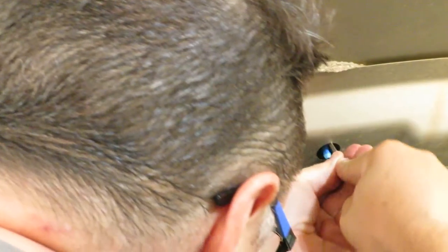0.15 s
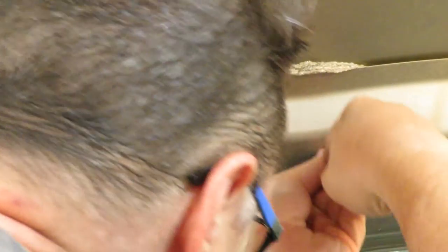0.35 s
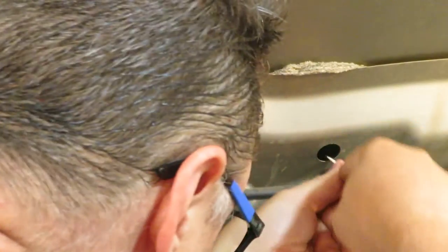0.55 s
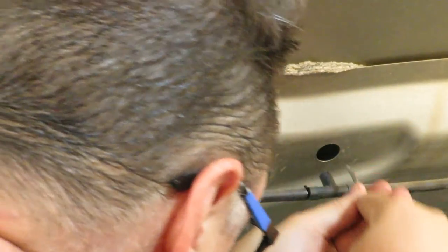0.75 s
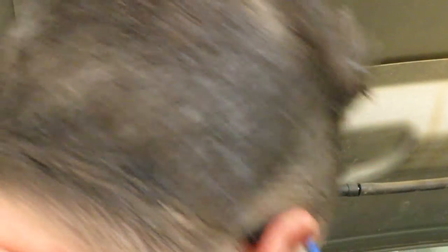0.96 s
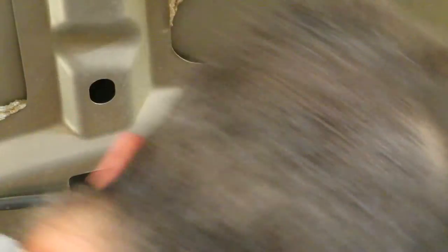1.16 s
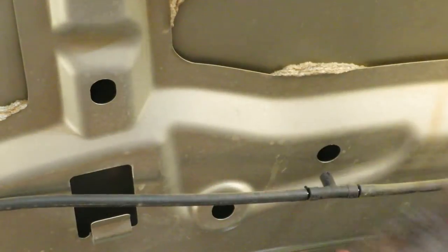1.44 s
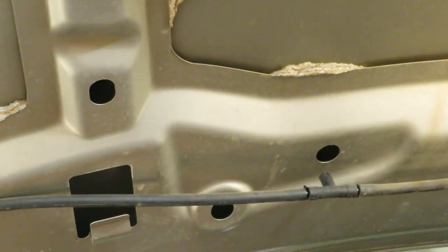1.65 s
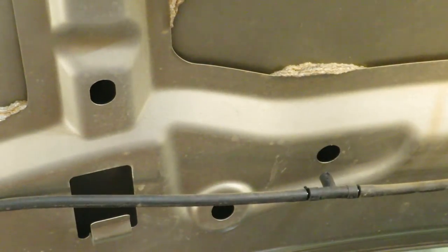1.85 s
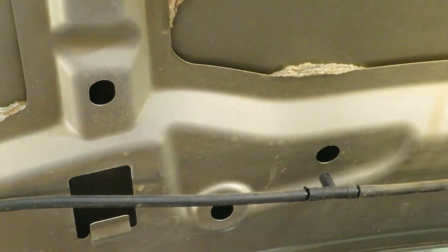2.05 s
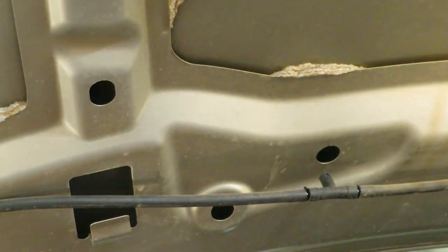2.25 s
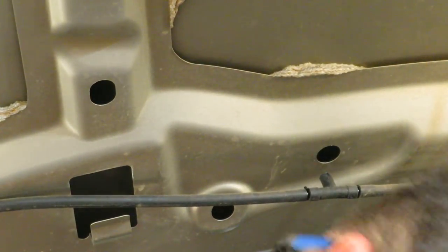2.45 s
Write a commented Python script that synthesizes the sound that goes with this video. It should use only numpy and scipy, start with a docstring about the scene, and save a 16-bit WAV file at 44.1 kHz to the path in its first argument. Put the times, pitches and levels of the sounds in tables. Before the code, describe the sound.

A plastic part snaps with one loud crack, then faint rubbing and clicks in a garage.

```python
"""Plastic crackles, then snaps with a loud crack: a nozzle worked out from under a car bonnet in a garage.
The crack overloads the microphone and sets panel and room ringing. Fingers rub the broken stub,
loose plastic clatters, metal ticks lightly and feet shuffle over a low rumble and faint hum.
The gain control ducks after the crack and lets the background creep back."""
import sys
import numpy as np
from scipy import signal
from scipy.fft import rfft, irfft
from scipy.io import wavfile

SR = 44100
rng = np.random.default_rng(int(sys.argv[2]) if len(sys.argv) > 2 else 0)


def unload_wav(signal):
    """Save mono or channel-first audio to the path in sys.argv[1] as 16-bit WAV at rate SR, clipped to [-1, 1]."""
    wavfile.write(
        sys.argv[1],
        SR,
        np.round(np.clip(np.atleast_2d(signal).T, -1, 1) * 32767).astype(np.int16),
    )


N = 114660
T = np.arange(N) / SR
BIN_HZ = np.maximum(np.arange(N // 2 + 1) * SR / N, 1)

# stereo width of air and swish: freq_hz, side_to_mid_db
AIR_WIDTH = [(30, -6.5), (70, -24), (130, -21.5), (400, -5.5), (1000, -10), (2000, -4.5), (4000, -3),
             (12000, -0.5)]


def snap():
    """The nozzle tears, then breaks in a dense burst; bonnet panel and garage ring on."""
    # break spectrum: freq_hz, density_db
    break_colour = [(50, -40), (160, -17), (450, -3.5), (900, -2.5), (1750, 3), (2400, -5.5), (3300, -3),
                    (5500, -21.5), (8200, -12), (12000, -22), (15500, -32)]
    # bonnet modes: freq_hz, gain_db, t60_s
    panel_modes = [(226.4, -7.5, 0.64), (345.5, -3, .55), (445, -5.5, 0.6), (474.6, -7, 0.48),
                   (549, -9, 0.68), (631, -1, 0.14), (861, -4, 0.46), (1134, -12.5, 0.94),
                   (1718, -1.5, 0.14), (1868, -3, .42), (2500, -5.5, 0.58)]
    # garage tail spectrum: freq_hz, density_db
    tail_colour = [(50, -32), (115, -14), (165, -14), (260, -11), (400, -2.5), (700, -8), (1150, -11),
                   (1800, -10), (3500, -17.5), (5500, -28.5), (8500, -35), (13000, -39), (15000, -52)]
    tear_s, break_s, attack_s = .2453, .2484, .0053
    tear_noise = noise([(100, 1.5), (700, -2.5), (3000, -7.5), (14000, -16)])
    tear = from_db(-20) * rise(tear_s, .0005) * decay(T - tear_s, t60_s=.05) * tear_noise
    onset = rise(break_s, attack_s)
    burst = from_db(13) * onset ** 2 * decay(T - break_s, t60_s=.12) * noise(break_colour)
    panel = onset * ring(blows([(break_s, -4)]), panel_modes)
    return tear + burst + panel + from_db(4) * garage_tail(tail_colour, break_s)


def crackles():
    """Strained plastic slips under the fingers and rings the nozzle."""
    # click runs: start_s, level_db, length_s
    runs = [(.129, -33, 0.018), (.211, -23.5, .012), (.2345, -24, 0.0075), (.42, -5, .015),
            (.652, -23.5, .012), (.693, -28, .02), (.756, -20.5, .025), (.82, -26.5, 0.012),
            (.833, -22, .025), (1.001, -21, 0.011)]
    # nozzle modes: freq_hz, gain_db, t60_s
    modes = [(1700, -8, 0.0041), (2970, -3.5, .0035), (5000, -5.5, .0012), (7500, -5, 0.0011),
             (10100, -3.5, 0.0015), (13000, -4.5, .0008)]
    return ring(slips(runs), modes)


def rubbing():
    """Grainy friction of fingers on the broken stub."""
    # friction envelope: time_s, level_db
    envelope = [(.27, -72), (.33, -19.5), (.6, -33), (.7, -31.5), (.735, -35), (.78, -33.5), (.81, -39.5),
                (.83, -34.5), (.88, -43.5), (1.05, -60)]
    # friction spectrum: freq_hz, density_db
    colour = [(200, -26), (550, -1), (1000, -5), (1600, 0), (3000, -2.5), (4800, -15.5), (8000, -22.5),
              (15000, -41)]
    grain_db = 2.5 * wander(per_s=560)
    return from_db(np.interp(T, *np.transpose(envelope)) + grain_db) * noise(colour)


def clatters():
    """The loose plastic piece rattles in short runs of soft contacts."""
    # contact runs: start_s, level_db, length_s, tilt_db_per_octave
    runs = [(0.92, -19, .012, 4.5), (0.975, -28, .004, 7.5), (1.084, -15, .03, -0.5),
            (1.152, -26.5, .015, 10), (2.156, -33.5, .008, 4.5)]
    # modes of the piece: freq_hz, gain_db, t60_s
    modes = [(617, -7, 0.012), (1020, -6, 0.0058), (1376, -3, 0.012), (2100, -4, 0.0065),
             (2600, -9, 0.0053), (3260, -9.5, 0.0038)]
    contact_cutoff_hz = 4500
    rattle = sum(ring(slips([(start_s, db, length_s)]), tilted(modes, tilt, pivot_hz=1430))
                 for start_s, db, length_s, tilt in runs)
    return signal.sosfilt(signal.butter(2, contact_cutoff_hz, fs=SR, output="sos"), rattle)


def metal_ticks():
    """Light taps ring metal briefly, each with one close reflection."""
    # taps: start_s, level_db, tilt_db_per_octave, pitch_ratio
    taps = [(1.2548, -26, 3, 0.963), (1.6757, -23, -2.5, 0.99), (1.9332, -28, 3.5, 1.01),
            (2.372, -34.5, 6, 1.01)]
    # metal modes: freq_hz, gain_db, t60_s
    modes = [(2640, -4.5, 0.0019), (4460, -2.5, 0.0014), (6230, -3, 0.0043), (9000, -4.5, 0.00059),
             (12550, -10, .0025)]
    echo_s, echo_db = .0018, 1
    out = np.zeros(N)
    for start_s, db, tilt, ratio in taps:
        clicks = blows([(start_s, db), (start_s + echo_s, db + echo_db)])
        tuned = [(hz * ratio, gain_db, t60_s) for hz, gain_db, t60_s in modes]
        out += ring(clicks, tilted(tuned, tilt, pivot_hz=6000))
    return out


def footsteps():
    """Soft shuffles excite low, damped resonances."""
    # shuffles: start_s, level_db, length_s
    runs = [(1.215, -37, 0.0196), (1.275, -33, 0.023), (1.772, -31, .03), (1.805, -34, .05),
            (2.15, -32, 0.0201), (2.178, -26.5, .025), (2.25, -32.5, .03)]
    # footfall modes: freq_hz, gain_db, t60_s
    modes = [(150, -6, .035), (226, 1, 0.041), (366.6, -1.5, 0.046), (810, -12, 0.0035)]
    return ring(slips(runs), modes)


def swish():
    """A soft swell of noise as the head moves away."""
    # swish spectrum: freq_hz, density_db
    colour = [(300, -19), (800, -12), (1020, 1), (1250, -12), (1900, -12), (3500, -46), (12000, -50)]
    peak_s, sigma_s = 1, .09
    return from_db(-51.5) * np.exp(-.5 * ((T - peak_s) / sigma_s) ** 2) * noise(colour, AIR_WIDTH)


def garage_tail(colour, start_s):
    """Diffuse reverberation; each band dies at its own rate."""
    # garage decay: freq_hz, t60_s
    band_decay = [(100, 0.67), (300, 0.51), (700, 0.58), (2000, .55), (4000, 0.61), (7000, .48),
                  (13000, 0.46)]
    centres_hz, t60s_s = np.transpose(band_decay)
    spectrum = rfft(noise(colour))
    tail = np.zeros((2, N))
    for share, t60_s in zip(np.eye(len(centres_hz)), t60s_s):
        band = irfft(spectrum * np.interp(np.log(BIN_HZ), np.log(centres_hz), share), N)
        tail += band * decay(T - start_s, t60_s)
    return rise(start_s, attack_s=.0057) * tail


def garage_response():
    """Unit-energy impulse response for small sounds; near walls answer first."""
    early_boost = 1 + from_db(3) * decay(T, t60_s=.11)
    response = early_boost * garage_tail([(100, -2), (6000, .5), (14000, -5)], start_s=0)
    return response / np.sqrt(np.sum(response ** 2) / 2)


def background():
    """Slightly uneven rumble and hiss, with a faint wavering hum."""
    # air spectrum: freq_hz, density_db
    colour = [(20, 0.5), (45, -0.5), (72, 4.5), (100, -4.5), (130, -4.5), (200, -12), (400, -12.5),
              (640, -18), (950, -15.5), (1400, -21.5), (2500, -27), (6000, -35), (12000, -44.5),
              (15000, -54.5)]
    # air envelope: time_s, level_db
    envelope = [(0, -40), (.25, -42), (.9, -44), (1.5, -44), (2.1, -44.5), (2.6, -40.5)]
    flicker_db = .8 * wander(per_s=31)
    air = from_db(np.interp(T, *np.transpose(envelope)) + flicker_db) * noise(colour, AIR_WIDTH)
    hum_hz = 119.5 + wander(per_s=16)
    hum = np.sqrt(2) * np.sin(2 * np.pi * np.cumsum(hum_hz) / SR)
    return air + from_db(-53.5) * hum


def from_db(db):
    """Decibels to gain."""
    return 10 ** (np.asarray(db) / 20)


def bin_gains(points):
    """Gain per FFT bin from (freq_hz, db) points, on a log-frequency axis."""
    hz, db = np.transpose(points)
    return from_db(np.interp(np.log(BIN_HZ), np.log(hz), db))


def decay(age_s, t60_s):
    """Exponential decay from age zero."""
    return np.exp(-np.log(1000) * np.maximum(age_s, 0) / t60_s)


def rise(start_s, attack_s):
    """Linear ramp from 0 to 1."""
    return np.clip((T - start_s) / attack_s, 0, 1)


def wander(per_s):
    """Random values joined by straight lines; spread about 1."""
    return np.interp(T * per_s, np.arange(N), rng.standard_normal(N))


def noise(colour, width=None):
    """Stereo noise of rms 1, wider in the treble; colour: freq_hz, density_db."""
    # stereo width of snap, rubbing and garage: freq_hz, side_to_mid_db
    default_width = [(60, -26), (400, -24.5), (1100, -29.5), (2000, -23), (3800, -11), (6500, -4.5),
                     (12000, -1.5)]
    mid, side = rfft(rng.standard_normal((2, N)))
    side = side * bin_gains(default_width if width is None else width)
    stereo = irfft(np.array([mid + side, mid - side]) * bin_gains(colour), N)
    return stereo / np.sqrt(np.mean(stereo ** 2) + 1e-20)


def ring(clicks, modes):
    """Clicks drive damped modes of alternating sign."""
    out = np.zeros(N)
    for k, (hz, db, t60_s) in enumerate(modes):
        radius, angle = decay(1 / SR, t60_s), 2 * np.pi * hz / SR
        feedback = [1, -2 * radius * np.cos(angle), radius ** 2]
        out += (-1) ** k * from_db(db) * signal.lfilter([0, np.sin(angle)], feedback, clicks + 1e-18)
    return out


def tilted(modes, db_per_octave, pivot_hz):
    """Harder contacts favour the upper modes."""
    return [(hz, db + db_per_octave * np.log2(hz / pivot_hz), t60_s) for hz, db, t60_s in modes]


def blows(rows):
    """One click per (start_s, level_db)."""
    out = np.zeros(N)
    for start_s, db in rows:
        out[int(start_s * SR)] += from_db(db)
    return out


def slips(runs, fade_db=8, count=40):
    """Fading runs of uneven tiny clicks that share each run's energy."""
    out = np.zeros(N)
    for start_s, db, length_s in runs:
        progress = (np.arange(count) + rng.random(count)) / count
        sizes = rng.standard_normal(count) * from_db(-fade_db * progress)
        samples = ((start_s + length_s * progress) * SR).astype(int)
        np.add.at(out, samples, from_db(db) * sizes / np.linalg.norm(sizes))
    return out


def scene():
    """Snap, handling noise, small sounds with their reverberation, and background."""
    snap_and_handling = snap() + rubbing() + swish()
    garage = garage_response()
    crackle, clatter, ticks, steps = crackles(), clatters(), metal_ticks(), footsteps()
    crackle_side = from_db(-2.5) * crackles()
    tick_lag_s = .00002
    left = crackle + crackle_side + ticks
    right = crackle - crackle_side + np.interp(T - tick_lag_s, T, ticks)
    direct = np.array([left, right]) + clatter + steps
    send = from_db(-2) * crackle + from_db(-1) * clatter + ticks + from_db(-1.5) * steps
    reverb = signal.fftconvolve(send[None], garage, axes=1)[:, :N]
    return snap_and_handling + direct + reverb + background()


def record(dry):
    """Gain control reacts late, so the crack clips, then recovers slowly. Bass and top are cut."""
    threshold_db, max_cut_db, recovery_db_per_s = -7, 17.5, 5
    reaction_s, attack_s = .0098, .004
    ceiling, low_cut_hz, high_cut_hz = .67, 60, 15400
    level_db = 20 * np.log10(np.abs(dry).max(axis=0) + 1e-9)
    excess_db = np.clip(level_db - threshold_db, 0, max_cut_db)
    recovery_db = recovery_db_per_s * T
    held_db = np.maximum.accumulate(excess_db + recovery_db) - recovery_db
    pole = np.exp(-1 / (attack_s * SR))
    cut_db = signal.lfilter([1 - pole], [1, -pole], np.interp(T - reaction_s, T, held_db))
    clipped = ceiling * np.tanh(dry * from_db(-cut_db) / ceiling)
    thinned = signal.sosfilt(signal.butter(2, low_cut_hz, "high", fs=SR, output="sos"), clipped)
    return signal.sosfilt(signal.ellip(12, .1, 80, high_cut_hz, fs=SR, output="sos"), thinned)


dry = scene()
out = record(dry)
unload_wav(out)
```